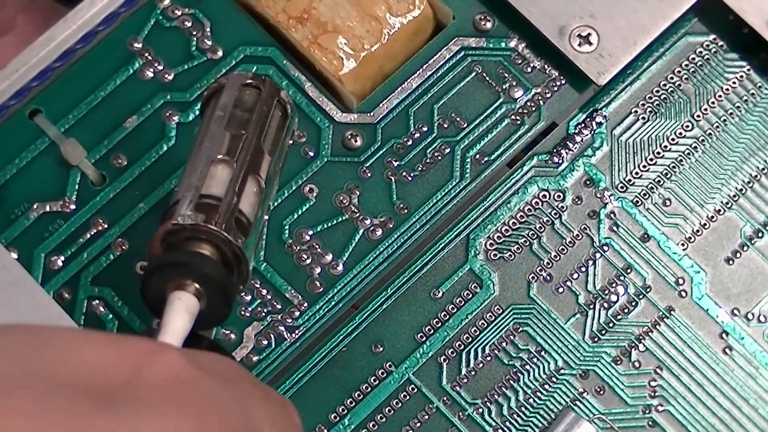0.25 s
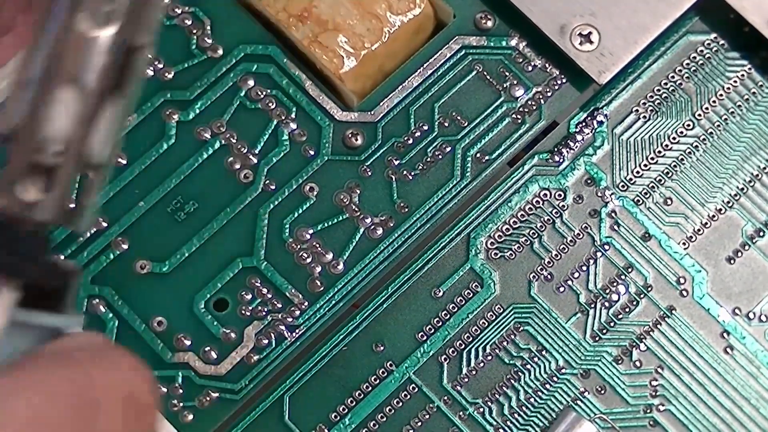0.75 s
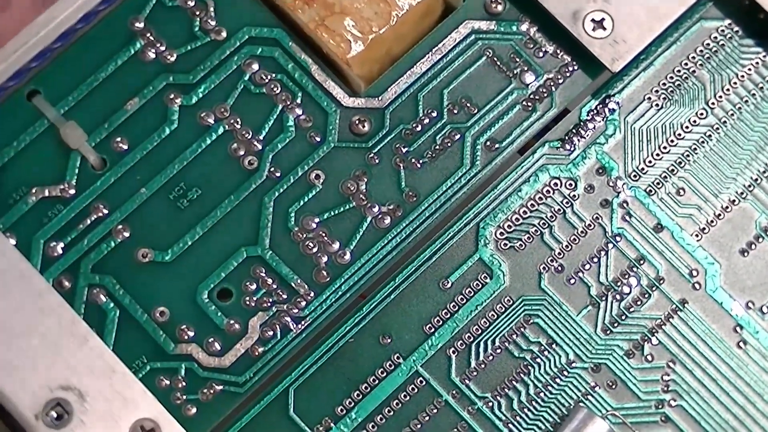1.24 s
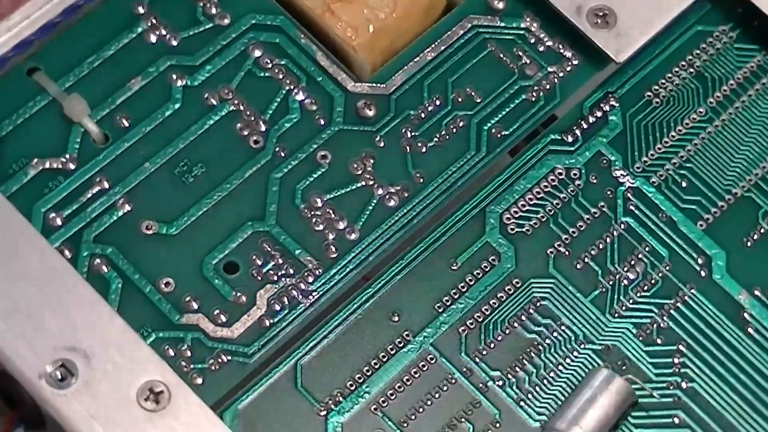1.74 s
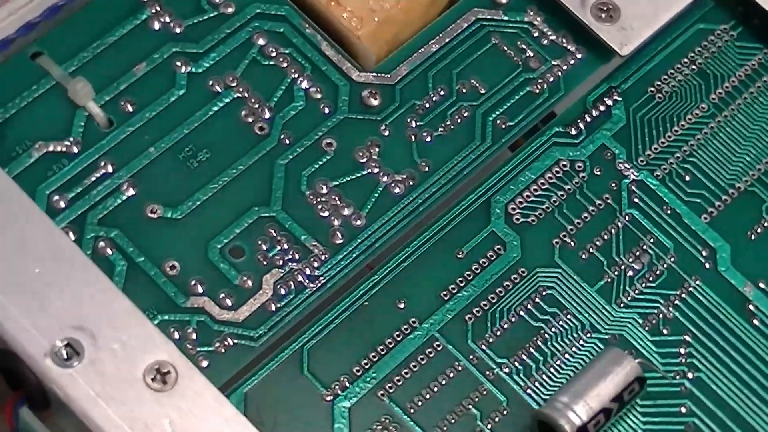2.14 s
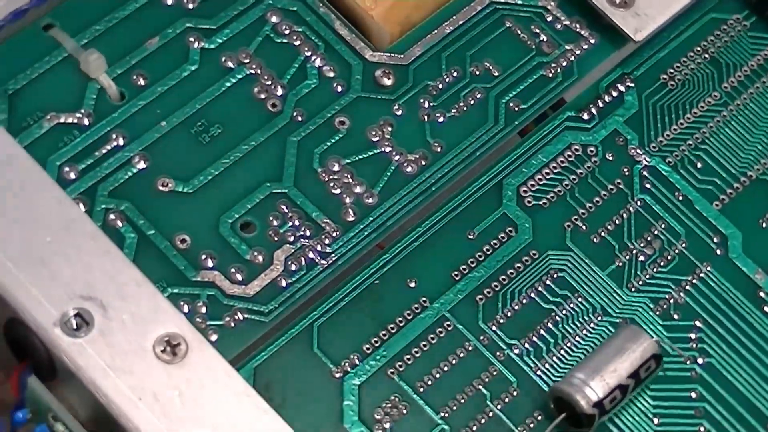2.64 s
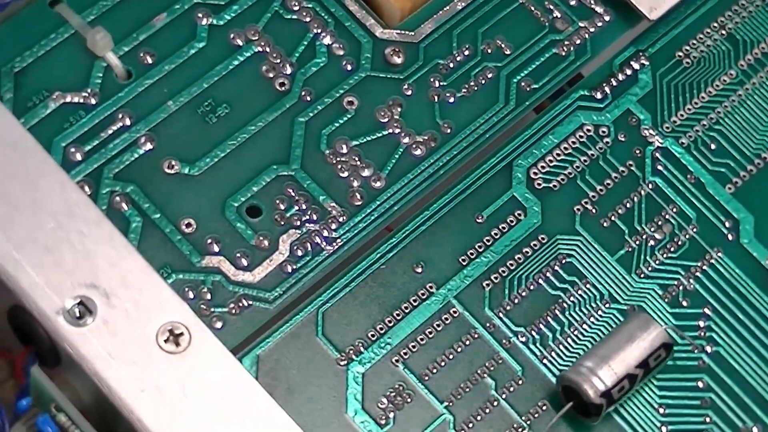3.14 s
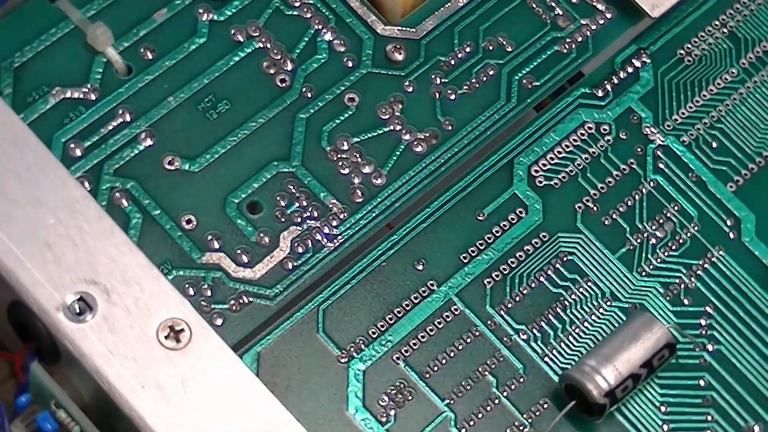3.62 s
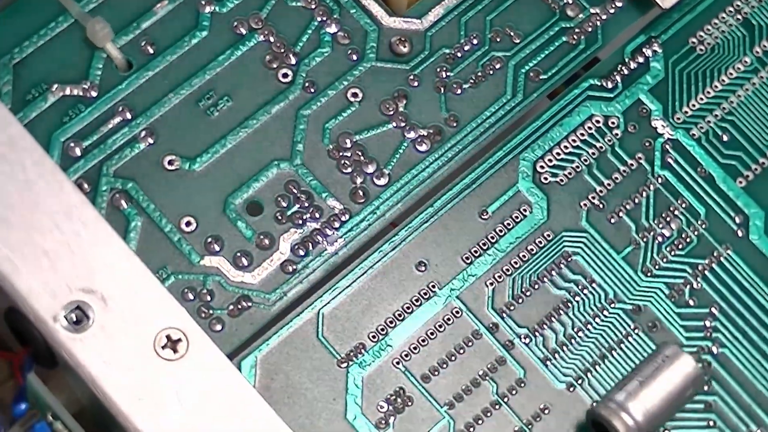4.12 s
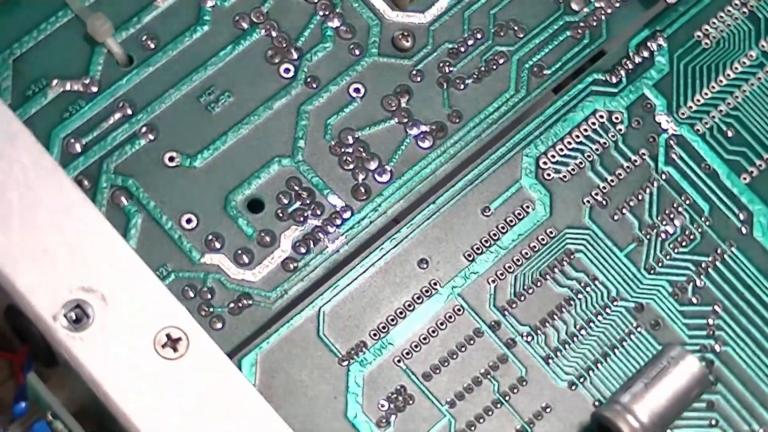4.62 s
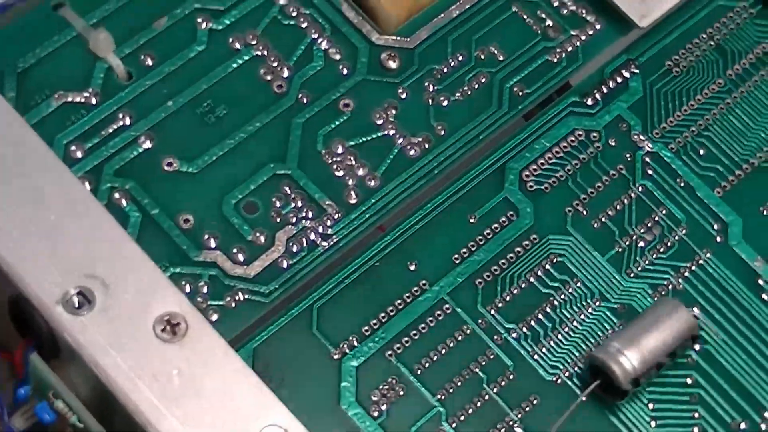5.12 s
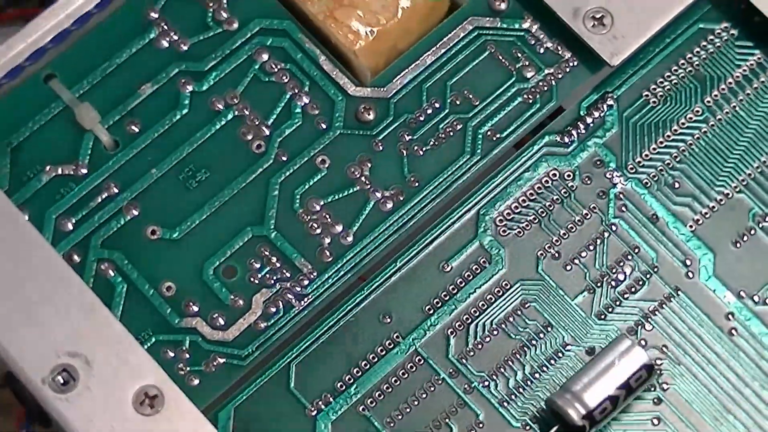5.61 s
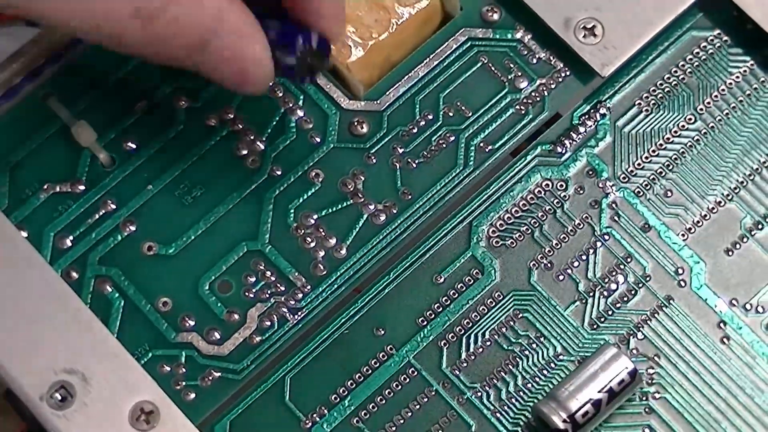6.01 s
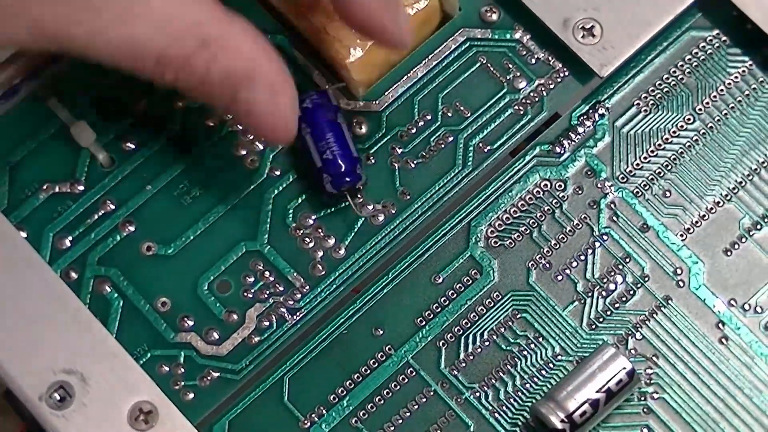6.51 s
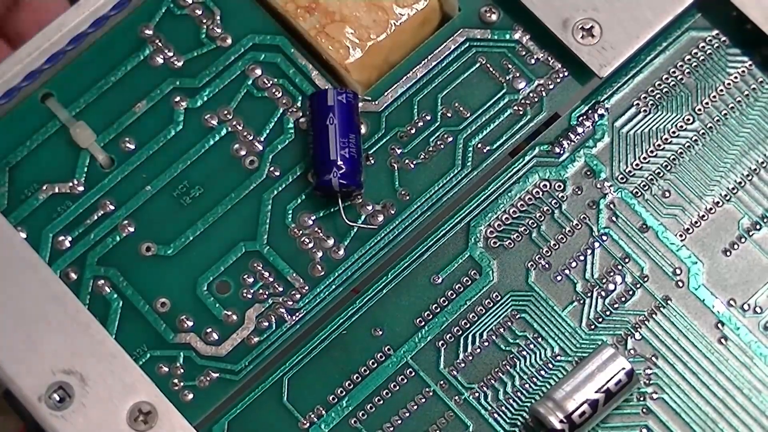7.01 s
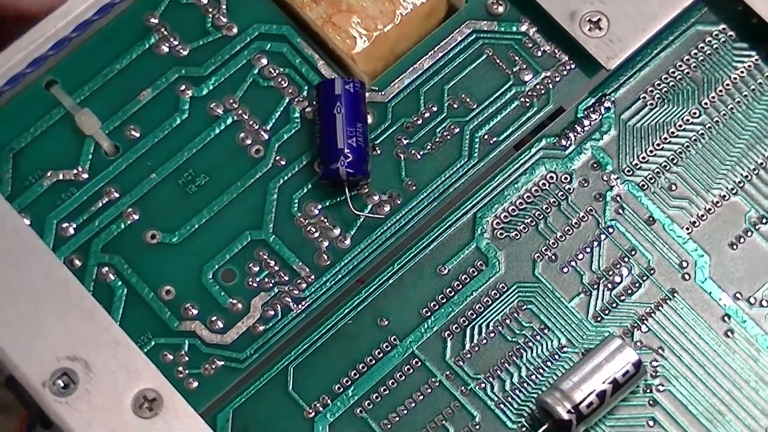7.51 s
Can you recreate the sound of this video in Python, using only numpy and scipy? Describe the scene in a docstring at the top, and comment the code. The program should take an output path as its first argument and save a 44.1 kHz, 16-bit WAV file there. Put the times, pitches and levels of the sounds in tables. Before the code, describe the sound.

A small pump buzzes briefly and sputters to a stop, the tool lands with two hard thumps, then light ticks, clinks and knocks follow.

```python
"""In a small, quiet workshop the diaphragm pump of a desoldering gun buzzes, is released and coasts
to a stop: its strokes ring a housing, slap a valve and pulse the air drawn in. The gun is put down
on the bench with two clattering thumps; then parts and tools are picked up, and tick, clink and knock
on circuit board and metal chassis: bursts of noise and decaying modes, over scrapes and room tone."""
import sys
import numpy as np
from scipy import signal
from scipy.fft import rfft, irfft
from scipy.io import wavfile
from scipy.ndimage import uniform_filter1d

SR = 44100
rng = np.random.default_rng(int(sys.argv[2]) if len(sys.argv) > 2 else 0)


def wav_out(sig):
    """Save sig, one row per channel (or a flat mono array), as 16-bit PCM at SR to the path in sys.argv[1]."""
    wavfile.write(sys.argv[1], SR, np.round(np.clip(np.atleast_2d(sig).T, -1, 1) * 32767).astype(np.int16))


N = 341775
TIME = np.arange(N) / SR


def amp(db):
    """Decibels to amplitude gain."""
    return 10 ** (np.asarray(db) / 20)


def unit(x):
    """Scale to an rms of 1."""
    return x / np.sqrt(np.mean(x ** 2) + 1e-20)


def at_hz(points, hz):
    """Interpolate a table along a logarithmic frequency axis."""
    f, value = np.transpose(points)
    return np.interp(np.log(np.maximum(hz, 1)), np.log(f), value)


def over_time(points):
    """Interpolate a table of (seconds, value) linearly over the whole scene."""
    return np.interp(TIME, *np.transpose(points))


def noise(spectrum, size=N):
    """Coloured noise: white noise weighted by a spectrum in dB, of rms 1."""
    gain = amp(at_hz(spectrum, np.fft.rfftfreq(size, 1 / SR)))
    return unit(irfft(rfft(rng.standard_normal(size)) * gain, size))


def clicks(times, heights):
    """Impulse excitation: one impulse at each time."""
    out = np.zeros(N) + 1e-18
    places = np.clip(np.round(np.asarray(times) * SR).astype(int), 0, N - 1)
    np.add.at(out, places, heights)
    return out


def convolve(x, response):
    """Linear superposition: every sample of x starts a copy of the impulse response."""
    return signal.fftconvolve(x, response)[:N]


def delay(x, seconds):
    """Propagation delay: the same sound, later."""
    return np.interp(TIME - seconds, TIME, x, left=0)


def butter(x, order, hz, kind="low"):
    """Maximally flat filter."""
    return signal.sosfilt(signal.butter(order, hz, kind, fs=SR, output="sos"), x)


def resonance(x, hz, width):
    """Damped resonator driven by x, with its bandwidth in Hz."""
    return signal.lfilter(*signal.iirpeak(hz, hz / width, fs=SR), x)


def fading(x, seconds):
    """Exponential relaxation: each impulse decays with this time constant."""
    return signal.lfilter([1], [1, -np.exp(-1 / (seconds * SR))], x + 1e-18)


def dying(times, db, t60):
    """Exponential energy decay: power of blows that each fall 60 dB in t60 seconds."""
    return signal.lfilter([1], [1, -amp(-60 / (t60 * SR)) ** 2], clicks(times, amp(db) ** 2))


def struck(blows, modes, scatter_db, detune=0.02):
    """Modal synthesis: each blow rings every mode, scattered in strength and tuning."""
    out, age = np.zeros(N + SR), TIME[:SR // 2]
    chances = rng.standard_normal((len(blows), 2, len(modes)))
    for (s, db), (strengths, shifts) in zip(blows, chances):
        start = round(s * SR)
        for (hz, mode_db, t60), strength, shift in zip(modes, strengths, shifts):
            ring = np.sin(2 * np.pi * hz * (1 + detune * shift) * age)
            level = db + mode_db + scatter_db * strength
            out[start:start + len(age)] += amp(level - 60 * age / t60) * ring
    return out[:N]


# Tone of the pump at full speed. Each row: multiple of the stroke rate, level in dB.
PUMP_HARMONICS = [(1, -32), (2, -12), (3, -14), (4, -4), (5, 0), (6, -1), (7, -3), (8, -13), (9, -18),
                  (10, -5), (11, -16), (12, -13), (13, -24), (14, -20), (15, -22), (16, -26), (17, -14),
                  (18, -11), (19, -14), (20, -27), (21, -22), (22, -31)]


def housing(rate, size=4096):
    """Minimum-phase response: the causal ring of the pump body after one stroke."""
    order, db = np.transpose(PUMP_HARMONICS)
    hz = np.fft.rfftfreq(size, 1 / SR)
    level = np.interp(hz, np.r_[0, order * rate, 1700, 4000], np.r_[-50, db, -50, -70])
    cepstrum = irfft(np.log(amp(level)))
    # keeping only the early half of the cepstrum, doubled and without its zeroth term, makes the ring causal
    causal = 2 * cepstrum[:size // 2] * (np.arange(size // 2) > 0)
    return irfft(np.exp(rfft(causal, size)))


def pump_case(x, bounce_s=.0075, bounce=0.52):
    """All-pass diffusion: bounces in the pump's case fill the gaps between strokes."""
    lag = np.exp(-2j * np.pi * np.fft.rfftfreq(N + SR, 1 / SR) * bounce_s)
    # dividing by lag takes the delay of the filter back out
    response = (lag - bounce) / (1 - bounce * lag) / lag
    return irfft(rfft(x, N + SR) * response, N + SR)[:N]


# Colour of valve slap and air. Each row: frequency in Hz, level in dB.
VALVE_COLOUR = [(700, -24), (1250, 4.5), (1600, 0.5), (2100, 3), (2900, 3), (4000, -1), (6200, -6.5),
                (7200, -12.5), (9500, -26), (12000, -30), (15000, -69)]


def valve_slaps(strokes, rate, slap_s=0.0032, rattle=0.34, loose=0.32):
    """Impulsive impact noise: a repeated slap at each stroke, partly never the same twice."""
    age = TIME[:int(SR / rate)]
    fall = np.exp(-age / slap_s) + rattle
    slap = noise(VALVE_COLOUR, size=len(age)) * fall
    # the slap takes the smooth colour of the valve, so its harmonics are even
    colour = amp(at_hz(VALVE_COLOUR, np.fft.rfftfreq(len(age), 1 / SR)))
    slap = irfft(np.exp(1j * np.angle(rfft(slap))) * colour, len(age))
    repeated = convolve(strokes, slap * np.sqrt(fall))
    varied = noise(VALVE_COLOUR) * convolve(strokes, fall)
    return unit(repeated) + loose * unit(varied)


# Air drawn through the nozzle. Each row: time in seconds, level in dB.
AIR_LEVEL = [(0, -49), (.39, -57), (.5, -52.5), (.62, -58.5), (.8, -57.5), (1.0, -106)]


def nozzle_air(turns, air_pulse=0.32, whistle_hz=6300, whistle_db=-2):
    """Turbulent flow noise, modulated by the strokes, with a resonant whistle of the intake valve."""
    whistle = unit(resonance(noise(VALVE_COLOUR), whistle_hz, whistle_hz / 7))
    # the whistle is brief and comes a sixth of a turn ahead of each stroke
    whistle = whistle * np.maximum(np.cos(2 * np.pi * (turns + 1 / 6)), 0) ** 4
    hiss = noise(VALVE_COLOUR) * (1 + air_pulse * np.cos(2 * np.pi * turns))
    return amp(over_time(AIR_LEVEL)) * (hiss + amp(whistle_db) * whistle)


# Pump motor. Each row: time in seconds, speed in strokes per second, stroke force in dB.
MOTOR_RUN = [(0, 56.35, 0), (.378, 56.35, 0), (.43, 44, -3), (.5, 29, -11), (.58, 17, -14), (.62, 0, -25)]
FIRST_STROKE_S, STROKE_SCATTER_DB = .0048, .6


def pump(body_db=-24, valve_db=-42, hum_db=-41, flutter_db=-37, return_db=0.5, return_hz=380,
         chug_s=0.012):
    """Periodic impulsive excitation: every stroke thuds the housing, slaps a valve and pulses the air."""
    s, speed, force_db = np.transpose(MOTOR_RUN)
    turns = np.cumsum(np.interp(TIME, s, speed)) / SR - FIRST_STROKE_S * speed[0]
    times = TIME[1:][np.diff(np.floor(turns)) > 0]
    scatter = STROKE_SCATTER_DB * rng.standard_normal(len(times))
    strokes = clicks(times, amp(np.interp(times, s, force_db) + scatter))
    # without drive the diaphragm also knocks dully on its way back, the more the slower it turns
    returns = TIME[1:][np.diff(np.floor(turns + .5)) > 0]
    slack = 1 - np.interp(returns, s, speed) / speed[0]
    knocks = clicks(returns, slack * amp(np.interp(returns, s, force_db) + return_db))
    knocks = butter(knocks, 2, return_hz)

    powered = TIME < s[1]
    thuds = -pump_case(convolve(strokes + knocks, housing(speed[0])))
    slaps = valve_slaps(strokes, speed[0])
    body = amp(body_db) * thuds / np.std(thuds[powered])
    valve = amp(valve_db) * slaps / np.std(slaps[powered])
    # the motor hums only while it has current
    current = uniform_filter1d(powered * 1., size=2000)
    motor_hum = amp(hum_db) * np.sqrt(2) * np.sin(2 * np.pi * HUM_PARTIALS[0][0] * TIME) * current
    # each stroke shakes the loose housing: separate chugs as the motor slows
    shaking = fading(np.sqrt(strokes), chug_s)
    chug_colour = [(60, -27), (280, -10), (650, 19), (1100, -13), (1600, -24), (5000, -63)]
    chugs = amp(flutter_db) * shaking * noise(chug_colour)
    return body + valve + motor_hum + chugs + nozzle_air(turns)


# Bench top modes. Each row: frequency in Hz, level in dB, t60 in seconds.
BENCH_MODES = [(121.8, -31, 0.62), (168.5, -5, 0.28), (186.4, -3, 0.17), (214, -2, 0.049),
               (282.4, -21, 0.39), (344.1, -28.5, 0.5)]
# Heavy things put down or bumped on the bench. Each row: time in seconds, boom in dB, clack in dB,
# clack pitch in Hz, dullness in dB per octave, number of rebounds (rounded when played).
BENCH_KNOCKS = [(1.163, -42.5, -37.5, 290, 25, 5), (1.372, -54.5, -40, 320, 4, -1),
                (1.663, -12, -8, 790, 12, 3.5), (1.881, -15.5, -15, 700, 16, 4),
                (2.428, -27, -32, 450, 7.5, 4), (2.606, -37, -64, 402, 18, 0),
                (2.869, -60, -36, 450, 9.5, -3.5), (3.056, -46, -40.5, 404, 4, -2),
                (3.113, -45, -44, 300, 1.5, 6), (4.769, -47, -45.5, 298, 22, 8),
                (5.0166, -14, -13, 740, 13, 4.5), (5.096, -20, -18, 700, 6, 1),
                (5.745, -29, -28, 1050, 1.5, 10), (6.674, -53, -49, 332, 8, -2.5),
                (6.97, -50, -36.5, 294, 17.5, -1), (7.175, -32.5, -29.5, 402, 6, -0.5),
                (7.633, -36.5, -20.5, 1100, 7.5, 0.5)]


def bench(echo_s=0.032, echo=0.74, level_db=1, lowest_hz=105, lag_s=.002):
    """Plate modes and a single echo: the bench booms, and the boom returns once from across the room."""
    blows = [(s + lag_s, db) for s, db, *_ in BENCH_KNOCKS]
    boom = struck(blows, BENCH_MODES, scatter_db=1.5)
    # a panel radiates little below its lowest mode
    boom = amp(level_db) * butter(boom, 3, lowest_hz, "high")
    return boom + echo * delay(butter(boom, 1, 900), echo_s)


# Panels of the chassis. Each row: frequency in Hz, level in dB, t60 in seconds.
CHASSIS_MODES = [(556, -7.5, 0.029), (761.4, 1.5, 0.092), (937, 0, 0.049), (1120, -16, 0.17),
                 (1442, -24, 0.11)]


def chassis(level_db=-8, lag_s=0.00252):
    """Modal excitation by impact: hard clacks ring the panels; soft, low ones hardly reach them."""
    blows = []
    for s, _, db, hz, dullness, _ in BENCH_KNOCKS:
        octaves_below = max(np.log2(CHASSIS_MODES[1][0] / hz), 0)
        blows.append((s + lag_s, db + level_db - dullness * octaves_below))
    return struck(blows, CHASSIS_MODES, scatter_db=4.5, detune=0.0054)


# Light taps on board and chassis. Each row: time in seconds, level in dB before the trims in taps(),
# pitch in Hz, dullness in dB per octave.
LIGHT_TAPS = [(.909, -52.5, 1500, 0), (.993, -48.5, 1500, 7), (1.187, -36.5, 4320, 1.5),
              (1.221, -37.5, 1870, 1), (1.726, -19.5, 1780, 5.5), (1.898, -21, 700, 4.5),
              (2.035, -50.5, 3000, -1), (2.296, -40, 1900, 13), (2.521, -35, 1830, 2),
              (2.811, -46, 1490, 4.5), (2.915, -42, 1200, 27), (2.946, -40, 1770, 6.5),
              (2.985, -42.5, 1590, 2.5), (3.048, -47.5, 2800, 0), (3.122, -34.5, 1750, 13),
              (3.181, -46, 1800, 6), (3.484, -33.5, 1490, 12), (3.687, -45.5, 1200, 9),
              (3.751, -44.5, 393, 0), (4.047, -45, 4000, 0.5), (4.153, -38, 1500, 26),
              (4.164, -30, 1650, 19), (4.2, -33.5, 1310, 7), (4.284, -42, 1730, 22),
              (4.706, -47, 2980, 0.5), (4.887, -40, 4260, -0.5), (5.036, -23.5, 1380, 6.5),
              (5.076, -26, 1480, 6), (5.114, -38.5, 1200, 0), (5.199, -29.5, 1270, 9),
              (5.551, -41, 1020, 11), (5.782, -30, 1310, 6.5), (6.007, -36, 1153, 14.5),
              (6.316, -55.5, 4800, -5.5), (6.412, -33.5, 1210, 5), (6.588, -45, 1810, 23),
              (6.615, -45.5, 1780, 11), (6.643, -45.5, 1680, 25), (7.345, -49, 1130, 4),
              (7.446, -51.5, 4270, -0.5)]
# a dropped tool rattles at an even pace, each rebound a little lighter than the one before
REBOUND_S, REBOUND_DB, REBOUND_LOSS_DB = 0.018, -17.5, 1
REBOUND_HZ, REBOUND_DULLNESS = 318, 1.8   # dullness in dB per octave
CLINK_CLICK_HZ = 1950   # at a pitch ratio of 1


def contacts():
    """Superposed impacts: every clack, rebound, tap and click as (s, dB, pitch Hz, dullness)."""
    rows = list(LIGHT_TAPS)
    for s, _, db, hz, dullness, rebounds in BENCH_KNOCKS:
        rows.append((s, db, hz, dullness))
        for k in range(round(rebounds)):
            rebound_db = db + REBOUND_DB - k * REBOUND_LOSS_DB
            rows.append((s + (k + 1) * REBOUND_S, rebound_db, REBOUND_HZ, REBOUND_DULLNESS))
    for s, db, dullness, _, ratio in METAL_CLINKS:
        rows.append((s, db, CLINK_CLICK_HZ * ratio, dullness))
    return rows


def stray_ticks(count=70, above_shuffle_db=-3, spread_db=3, pitch_hz=1500, dullness=5):
    """Random impacts: faint chance touches, as strong as the hands are busy."""
    times = (np.arange(count) + rng.random(count)) / count * TIME[-1]
    size, pitch = rng.standard_normal((2, count))
    db = np.interp(times, *np.transpose(HAND_LEVEL)) + above_shuffle_db + spread_db * size
    return list(zip(times, db, pitch_hz * 2 ** (pitch / 2), np.full(count, dullness)))


# How fast the ring of a contact dies. Each row: frequency in Hz, t60 in seconds.
RING_DECAY = [(330, 0.062), (780, 0.13), (1900, 0.082), (4300, 0.069), (9000, 0.056)]
# below its pitch a contact thins out, down to what the bench passes on
THIN_DB_PER_OCTAVE, BASS_FLOOR_DB = 7.5, -21.5
# the duller it is, the sooner it loses its top
TOP_HZ, TOP_DROP_OCTAVES_PER_DULLNESS = 5470, 0.062


def taps(rows, level_db=-1.5, rise_s=0.00028, rise_cycles=1.0, top_fall_db=16, top_bend_db=5,
         crack_db=2, crack_t60=0.011, ring_db=-3):
    """High modal density: the crowded modes of board and bench, as noise that dies band by band."""
    times, peak_db, pitch, dullness = np.transpose(rows)
    edges, white, out = np.geomspace(220, 15500, 16), rng.standard_normal((2, N)), 0
    for k, (low, high) in enumerate(zip(edges, edges[1:])):
        hz = np.sqrt(low * high)
        octaves = np.log2(hz / pitch)
        over_top = np.maximum(np.log2(hz / TOP_HZ) + TOP_DROP_OCTAVES_PER_DULLNESS * dullness, 0)
        thinning = np.maximum(THIN_DB_PER_OCTAVE * octaves, BASS_FLOOR_DB)
        colour = np.where(octaves > 0, -dullness * octaves, thinning)
        top_loss = top_fall_db * over_top + top_bend_db * over_top ** 2
        db = peak_db + level_db + colour - top_loss
        # a brief crack, then the longer ring
        crack = dying(times, db + crack_db, crack_t60)
        ring = dying(times, db + ring_db, at_hz(RING_DECAY, hz))
        r = np.exp(-1 / (SR * (rise_s + rise_cycles / hz)))
        envelope = signal.lfilter([1 - r], [1, -r], np.sqrt(crack + ring))
        band = unit(butter(white[k % 2], 2, [low, high], "band"))
        # the energy of a blow is set by the blow, so the slow swell of the band is evened out
        band = band / np.sqrt(uniform_filter1d(band ** 2, size=600) + 1e-6)
        out = out + band * envelope
    return out


# Resonances of the board that colour every contact. Each row: frequency in Hz, width in Hz,
# level in dB relative to the plain sound.
BOARD_RESONANCES = [(333, 22, 14), (1040, 23, -5.5), (1160, 2.3, -2.5), (1487, 56, -2.5), (1660, 146, -5.5),
                    (2140, 300, -8.5), (2686, 86, -5.5)]


def board(x, plain_db=-3.5):
    """Forced resonance: the board passes a contact on and rings at its own frequencies."""
    rings = sum(amp(db) * resonance(x, hz, width) for hz, width, db in BOARD_RESONANCES)
    return amp(plain_db) * (x + rings)


# Small metal parts knock together and ring. Each row: time in seconds, click in dB, dullness of the
# click in dB per octave, ring in dB, pitch as a ratio to the part modes.
METAL_CLINKS = [(1.372, -38.5, 2.5, -40, 0.94), (1.854, -31.5, 9, -46, 1.31), (1.938, -24, 36, -38.5, 1.25),
                (2.238, -32.5, 4, -46, 1.38), (3.221, -38.5, 29, -39, 1.0), (3.486, -41, 3, -34.5, 1.045),
                (4.752, -37.5, 11, -60, 1.0), (5.224, -25.5, 4.5, -36, 0.91), (6.381, -27, 9, -39, 1.01)]
# Modes of the parts. Each row: frequency in Hz at a ratio of 1, level in dB, t60 in seconds.
PART_MODES = [(1660, 14, 0.034), (1850, 10.5, 0.04), (2060, -8, 0.041), (2300, -7, 0.067),
              (4050, 3.5, 0.067), (5000, -10, 0.037), (5270, -4, 0.032)]


def clinks(level_db=-2, contact_s=0.00042, split=0.026, damping_db=5):
    """Split modes: close pairs beat as a part rings; a dull contact excites the upper ones less."""
    out, age = np.zeros(N), TIME[:SR // 4]
    dullest = max(row[2] for row in METAL_CLINKS)
    chances = rng.random((len(METAL_CLINKS), len(PART_MODES), 3))
    attack = np.minimum(age / contact_s, 1)
    for (s, _, dullness, db, ratio), chance in zip(METAL_CLINKS, chances):
        start = round(s * SR)
        for (hz, mode_db, t60), (phase, shift, gap) in zip(PART_MODES, chance):
            loss_db = damping_db * np.log2(hz / PART_MODES[0][0]) * (dullness / dullest) ** 2
            cycles = hz * ratio * (1 + split * (shift - .5)) * age + phase
            pair = np.sin(2 * np.pi * cycles) * np.cos(np.pi * hz * split * gap * age)
            level = db + level_db + mode_db - loss_db - 60 * age / t60
            out[start:start + len(age)] += amp(level) * pair * attack
    return out


# Resonances of the scratch. Each row: frequency in Hz, width in Hz, level in dB.
SCRATCH_RESONANCES = [(1900, 84, 11.5), (2540, 160, 14.5), (3080, 58, 16), (4110, 110, 14.5),
                      (4720, 120, 9.5), (5190, 150, -6.5), (6280, 260, 1.5), (6990, 67, 10)]


def scratch(size, grains_per_s=1500, grain_db=4.5, plain_db=-13, wander=.04, top_hz=8500):
    """Stick-slip friction: dense tiny slips ring the rubbed parts, retuned slightly at every call."""
    sizes = amp(grain_db * np.minimum(rng.exponential(1, size), 4))
    slips = (rng.random(size) < grains_per_s / SR) * rng.choice([-1, 1], size) * sizes
    ratio = np.exp(wander * rng.standard_normal())
    rings = sum(amp(db) * resonance(slips, hz * ratio, width * ratio)
                for hz, width, db in SCRATCH_RESONANCES)
    return unit(butter(rings + amp(plain_db) * slips, 2, top_hz))


# How busily the hands shift things about. Each row: time in seconds, level of the shuffle in dB.
HAND_LEVEL = [(.6, -57), (1.08, -65.5),  (1.2, -62), (1.55, -65), (1.75, -47), (2.1, -52), (2.5, -51),
              (2.72, -54.5), (3.14, -49), (3.33, -67.5), (3.85, -55.5), (4.52, -72.5), (4.7, -51),
              (4.98, -52.5), (5.5, -61.5), (6.48, -68), (6.66, -57.5), (6.8, -69), (7.0, -51.5),
              (7.3, -66.5)]
# Colour of the shuffle. Each row: frequency in Hz, level in dB.
SHUFFLE_COLOUR = [(40, -47), (100, -0.5), (170, 2.5), (300, -0.5), (500, -4), (1700, -10), (3000, -19),
                  (9000, -40.5)]
# Short scrapes of metal on the board. Each row: middle in seconds, half length in seconds, level in dB.
METAL_SCRAPES = [(1.025, 0.026, -55.5), (1.105, 0.013, -51), (1.198, 0.059, -48), (1.29, 0.031, -51),
                 (1.628, 0.076, -53.5), (2.009, 0.053, -50.5), (2.377, 0.067, -50), (2.523, 0.018, -39),
                 (2.732, 0.028, -54.5), (3.134, 0.013, -52), (4.599, 0.026, -53), (4.722, 0.087, -52.5),
                 (4.88, 0.042, -44.5)]


def rubbing(catch_db=2, catches_per_s=70, catch_s=.009, smooth_share=0.17):
    """Friction noise: short scrapes over a dull shuffle; the motion catches and lets go."""
    # the shuffle comes in separate little catches
    catches = (rng.random(N) < catches_per_s / SR) * rng.random(N)
    grain = unit(np.sqrt(fading(catches, catch_s) + smooth_share))
    out = amp(over_time(HAND_LEVEL)) * grain * noise(SHUFFLE_COLOUR)
    for middle, half_length, db in METAL_SCRAPES:
        near = np.abs(TIME - middle) < half_length
        swell = np.cos(np.pi / 2 * (TIME[near] - middle) / half_length) ** 2
        out[near] += swell * amp(db) * np.resize(scratch(size=SR // 4), len(swell))
    unsteadiness = amp(catch_db * noise([(50, 0), (400, -50), (2000, -90)]))
    return out * unit(unsteadiness)


# Soft swishes. Each row: middle in seconds, half length in seconds, level in dB.
SWISHES = [(2.233, 0.19, -55), (6.96, 0.28, -57)]
# Colour of the swishes. Each row: frequency in Hz, level in dB.
CLOTH_COLOUR = [(900, -23), (1900, -4), (2450, 3), (3600, -6), (4800, -5), (9000, -20.5), (14000, -34)]


def swish():
    """Broadband friction noise: airy swells, likely a sleeve sliding over the bench as the arm moves."""
    swell = 0
    for middle, half_length, db in SWISHES:
        place = np.clip((TIME - middle) / half_length, -1, 1)
        swell = swell + amp(db) * np.cos(np.pi / 2 * place) ** 2
    return swell * noise(CLOTH_COLOUR)


def workshop(x, t60=0.3, treble_t60=0.027, first_s=0.0073):
    """Diffuse reverberation: a decaying noise tail whose treble has its own decay time."""
    age = TIME[:SR // 2]
    low_colour = [(100, 10.5), (300, 1.0), (1500, 6.5), (3000, 6.9), (8000, 5.4)]
    high_colour = [(1000, -72), (3500, 5.0), (12000, 9.0)]
    low = noise(low_colour, size=len(age)) * amp(-60 * age / t60)
    high = noise(high_colour, size=len(age)) * amp(-60 * age / treble_t60)
    tail = (low + high) * (age > first_s)
    return convolve(x, tail / np.sqrt(np.sum(tail ** 2)))


# Mains hum. Each row: frequency in Hz, level in dB.
HUM_PARTIALS = [(120, -71.5), (240, -74.5), (360, -69), (480, -73.5)]


def mains_hum():
    """Harmonic series: steady sines with random phases."""
    return sum(amp(db) * np.sqrt(2) * np.sin(2 * np.pi * (hz * TIME + rng.random()))
               for hz, db in HUM_PARTIALS)


# Colour of the room tone. Each row: frequency in Hz, level in dB.
ROOM_COLOUR = [(25, -25), (60, -1), (120, -1.5), (330, -4), (700, -6), (1500, -10.5), (3000, -12.5),
               (6000, -19), (10000, -27.5), (13000, -36.5), (15500, -57)]
# How unlike the two capsules hear the room tone. Each row: frequency in Hz, side minus mid in dB.
ROOM_SIDE = [(60, -12.5), (240, -2.5), (950, -2.5), (3770, -6), (15000, -17)]
ROOM_TONE_DB = -61


def room_tone():
    """Partly coherent diffuse field: independent coloured noise in mid and side."""
    mid = amp(ROOM_TONE_DB) * noise(ROOM_COLOUR)
    width = amp(ROOM_TONE_DB + at_hz(ROOM_SIDE, np.fft.rfftfreq(N, 1 / SR)))
    return mid, irfft(rfft(noise(ROOM_COLOUR)) * width, N)


def scene(room_db=-12, pump_room_db=-14, side_db=-20, side_hz=500):
    """Mid-side stereo: everything lies just ahead of a narrow stereo microphone."""
    buzz = pump()
    impacts = board(taps(contacts() + stray_ticks())) + bench() + chassis() + clinks()
    handling = impacts + rubbing() + swish()
    reverb = workshop(amp(room_db) * handling + amp(pump_room_db) * buzz)
    room_mid, room_side = room_tone()
    mid = buzz + handling + reverb + room_mid + mains_hum()
    # the capsules differ in near reflections and room tone, and hardly at all in the bass
    reflections = workshop(buzz + handling, t60=.2, treble_t60=.2, first_s=.001)
    side = amp(side_db) * butter(reflections, 1, side_hz, "high") + room_side
    return np.array([mid + side, mid - side]) * amp([[.25], [-.25]])   # channel balance in dB


CUTOFF_HZ = 15500


def record(dry):
    """Soft saturation and band limiting: the highest peaks are rounded and the top is cut."""
    rounded = dry / (1 + (dry / .88) ** 6) ** (1 / 6)
    return signal.sosfilt(signal.cheby2(12, 70, CUTOFF_HZ, fs=SR, output="sos"), rounded)


dry = scene()
out = record(dry)
wav_out(out)
```